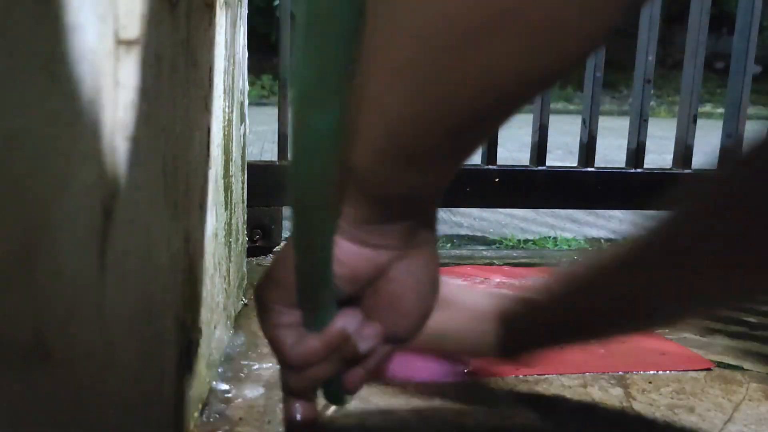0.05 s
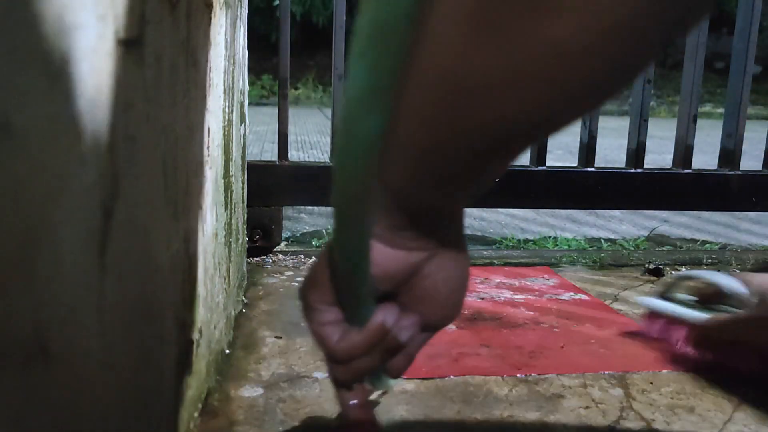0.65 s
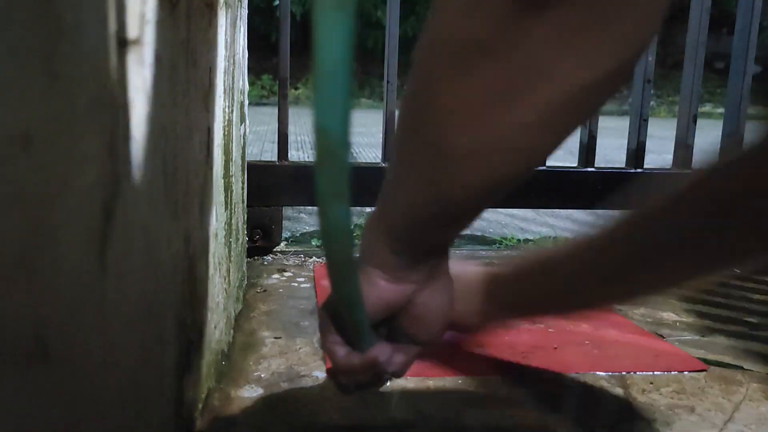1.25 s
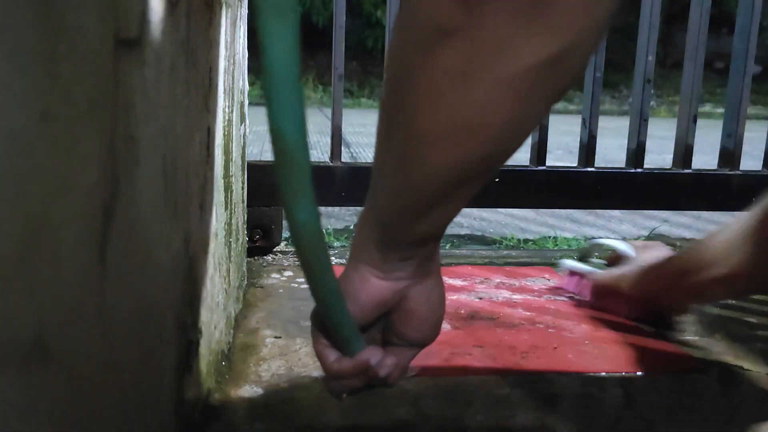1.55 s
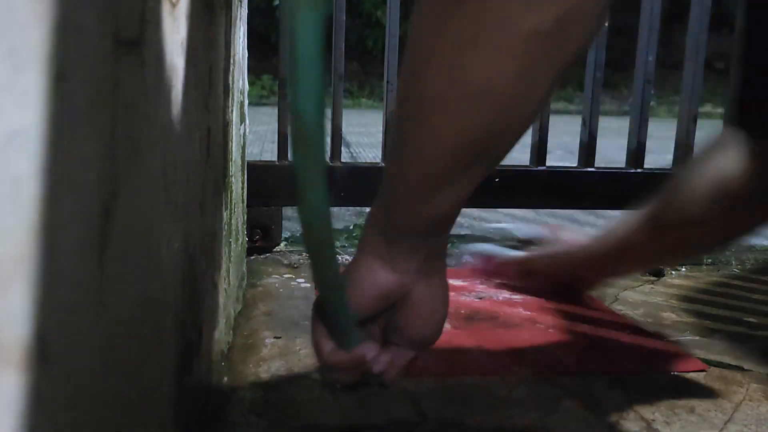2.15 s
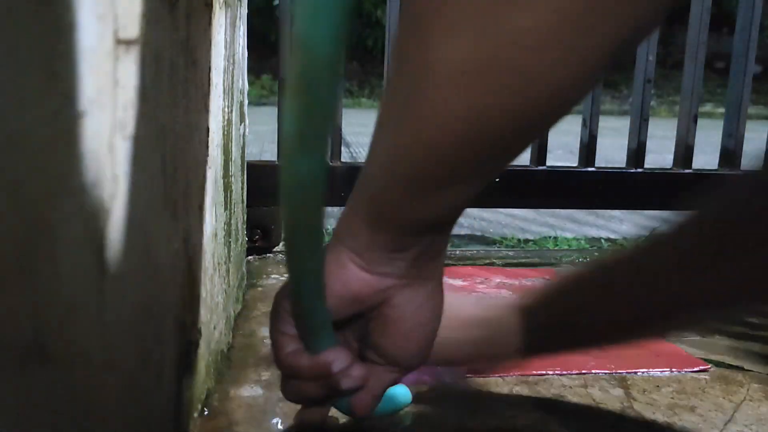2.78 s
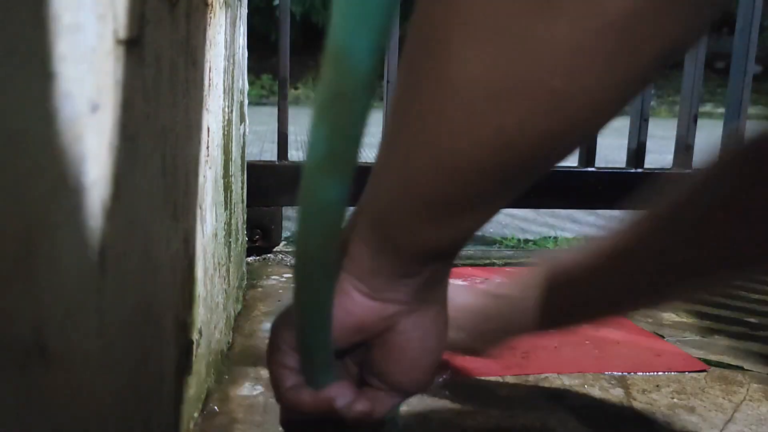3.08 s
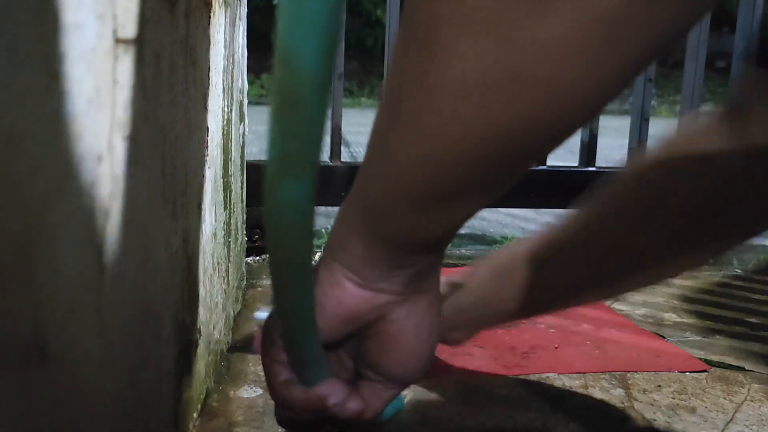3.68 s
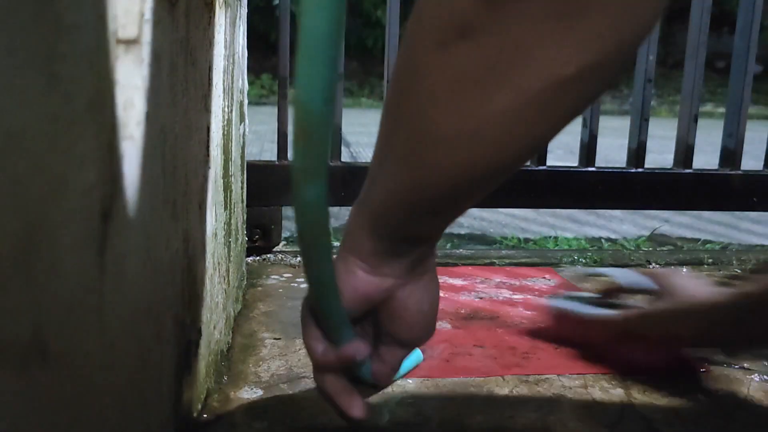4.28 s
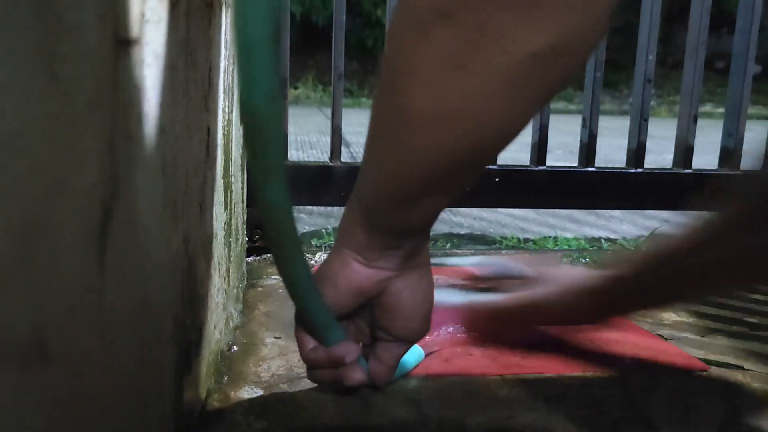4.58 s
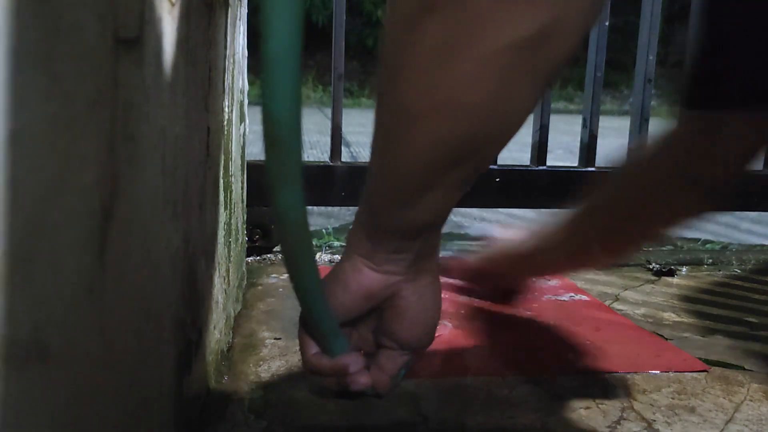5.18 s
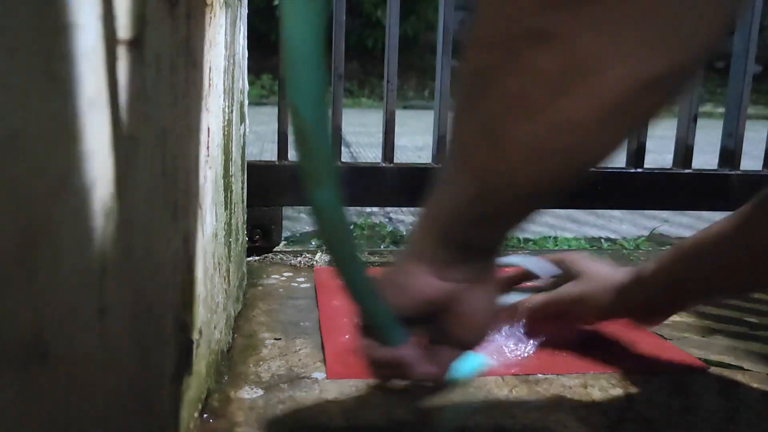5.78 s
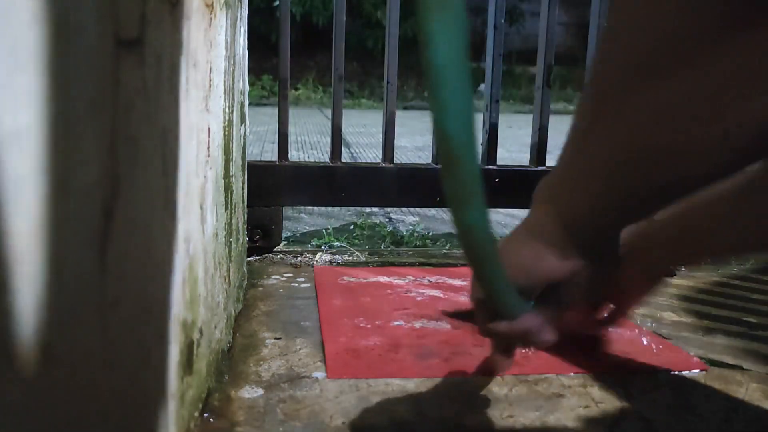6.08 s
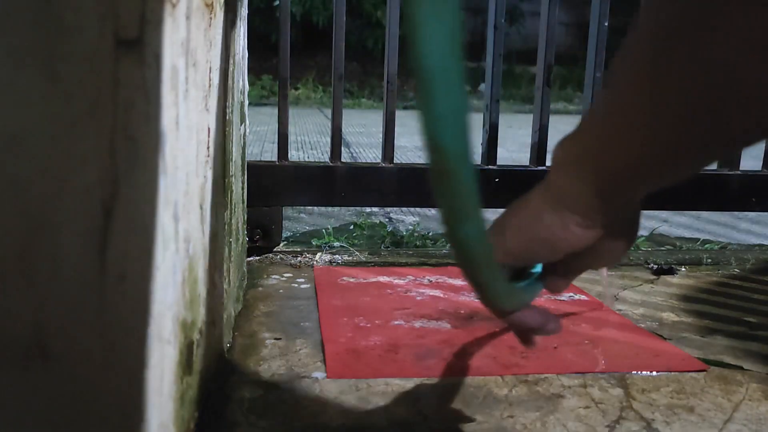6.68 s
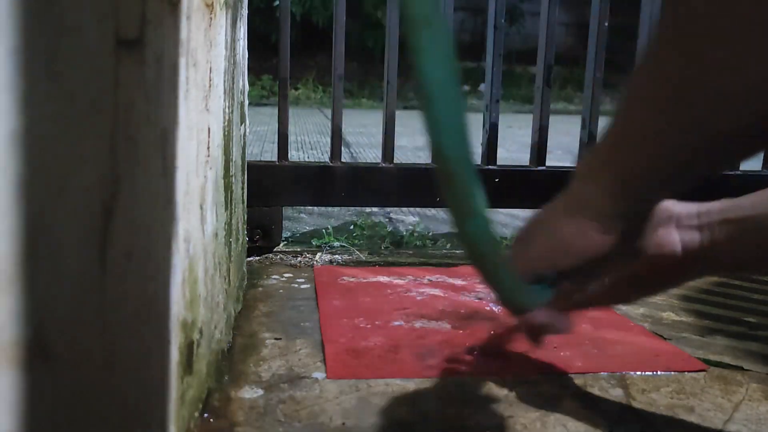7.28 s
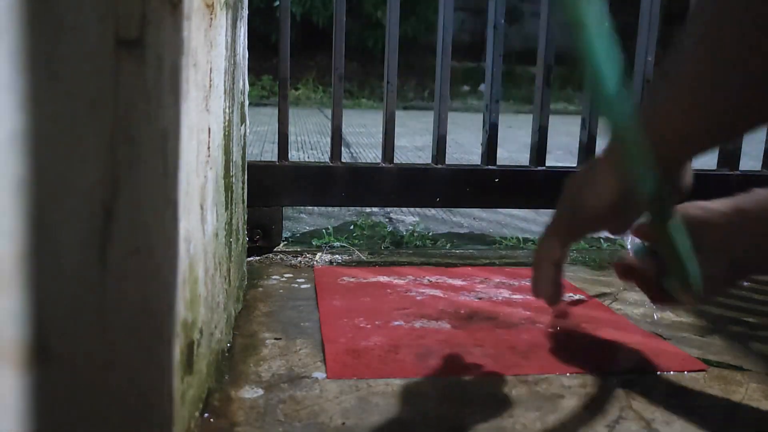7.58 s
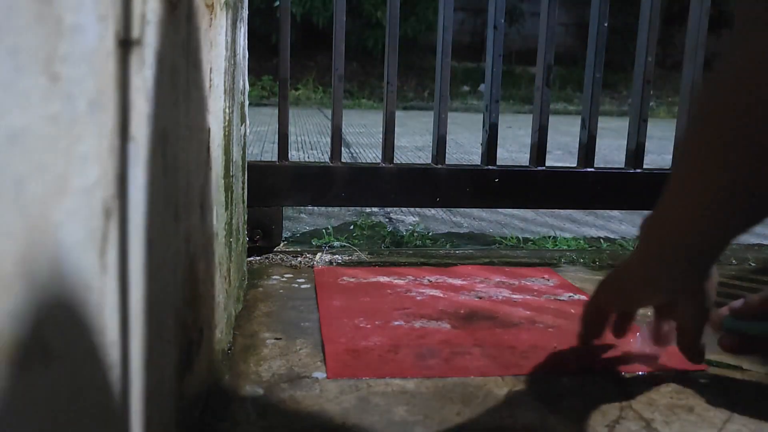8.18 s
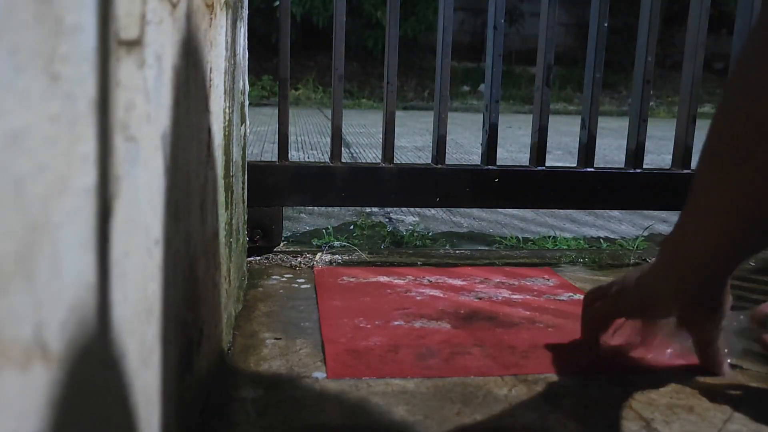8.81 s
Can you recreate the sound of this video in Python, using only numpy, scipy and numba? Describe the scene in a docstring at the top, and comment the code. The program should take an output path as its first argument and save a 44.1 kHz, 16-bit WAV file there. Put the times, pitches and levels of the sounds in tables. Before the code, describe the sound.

A hand brush scrubs wet plastic in quick, hissing strokes, then a loud ringing metal bang and a few small splashes follow.

```python
"""Scrubbing a wet tray

A hand brush scrubs a wet plastic tray on a porch floor, back and forth, close to a phone.
Bristles flip at each turn and hiss, the wet gap under them resonates, and hasty strokes drum the tray.
The brush is tossed aside and bangs on sheet metal, which ducks the phone's limiter;
a hose dribbles and a hand squelches on the tray, over a low rumble and the hum of a distant motor."""
import sys
import numpy as np
from scipy import signal
from scipy.fft import rfft, irfft, next_fast_len
from scipy.io import wavfile
from scipy.ndimage import uniform_filter1d, minimum_filter1d
from numba import njit

SR = 44100
rng = np.random.default_rng(int(sys.argv[2]) if len(sys.argv) > 2 else 0)


def unload_wav(signal):
    """Save mono or channel-first audio to the path in sys.argv[1] as 16-bit WAV at rate SR, clipped to [-1, 1]."""
    wavfile.write(
        sys.argv[1],
        SR,
        np.round(np.clip(np.atleast_2d(signal).T, -1, 1) * 32767).astype(np.int16),
    )


N = 390285
TIME = np.arange(N) / SR
TOP_HZ = 15600
LIFT_S = 6.215  # the brush leaves the tray


def undb(db):
    """Decibels to gain."""
    return 10 ** (np.asarray(db) / 20)


def unit(x):
    """Scale to rms 1."""
    return x / np.sqrt(np.mean(x ** 2))


def noise(size=N):
    """White noise."""
    return rng.standard_normal(size)


def walk(rate_hz):
    """Smooth random drift, spread near 1."""
    steps = noise(int(N / SR * rate_hz) + 2)
    return np.interp(TIME * rate_hz, np.arange(len(steps)), steps) * np.sqrt(3 / 2)


def curve(rows):
    """Join (time [s], value) rows by straight lines."""
    return np.interp(TIME, *np.transpose(rows))


def colour(x, points):
    """Filter by (frequency [Hz], level [dB]) points; rms 1."""
    hz, db = np.transpose(points)
    size = next_fast_len(N)
    bins_hz = np.maximum(np.fft.rfftfreq(size, 1 / SR), 1)
    gain = undb(np.interp(np.log(bins_hz), np.log(hz), db))
    return unit(irfft(rfft(x, size) * gain, size)[:N])


@njit
def svf(x, hz, q):
    """Swept state-variable filter; returns band-pass and high-pass."""
    band, high = np.empty(len(x)), np.empty(len(x))
    band_state, low_state = 0., 0.
    for i in range(len(x)):
        g = np.tan(np.pi * hz[i] / SR)
        v = (band_state + g * (x[i] - low_state)) / (1 + g * (g + 1 / q))
        band[i] = v / q
        high[i] = x[i] - v / q - low_state - g * v
        band_state, low_state = 2 * v - band_state, low_state + 2 * g * v
    return band, high


def resonate(x, hz, q):
    """Two band-passes in series; roughly keeps the rms of white noise."""
    hz = np.clip(hz, 20, SR / 3) * np.ones(len(x))
    for _ in range(2):
        x, _high = svf(x, hz, float(q))
    return x * np.sqrt(2 * SR * q / (np.pi * hz))


def fade(age_s, t60_s):
    """Exponential decay from age 0, silent before."""
    return (age_s >= 0) * np.exp(-np.log(1000) * np.maximum(age_s, 0) / t60_s)


# air spectrum: (frequency [Hz], level [dB])
AIR_SPECTRUM = [(120, -4.5), (200, 0.5), (427, -17), (790, -11.5), (912, -10), (1070, -14.5), (1450, -18.5),
                (2100, -29), (6000, -26), (7000, -22), (7700, -31), (13000, -23), (16000, -37)]


def night_air(level_db=-55):
    """Still night air: faint, steady noise."""
    return colour(noise(), AIR_SPECTRUM) * undb(level_db)


# motor tones: (frequency [Hz], rms level [dB])
MOTOR_TONES = [(59.2, -55), (177.6, -68.5), (915, -67.5), (1540, -66), (1588, -74)]


def motor_hum(waver_db=3.5):
    """A distant motor; each tone wavers in level."""
    return sum(undb(db + waver_db * walk(5.2)) * np.sqrt(2) * np.sin(2 * np.pi * hz * TIME)
               for hz, db in MOTOR_TONES)


# rumble spectrum: (frequency [Hz], level [dB])
RUMBLE_SPECTRUM = [(20, -1), (40, -3.5), (52, -1), (59, 11.5), (68, -4), (130, -3.5), (200, -12),
                   (300, -21), (600, -19), (1500, -19), (4000, -61.5)]
# rumble from the last strokes on: (time [s], level [dB])
LATE_RUMBLE = [(5.94, -47), (6.01, -36), (6.2, -33), (6.66, -55.5), (6.87, -36), (7.2, -32), (7.74, -51),
               (7.84, -38.5), (8.3, -57.5), (8.47, -53), (8.51, -42.5), (8.85, -53)]


def rumble(calm_db=-51.5, hasty_db=-33.5, jolt_db=-41.5, jolt_lag_s=.059, jolt_width_s=.032):
    """Low noise that jolts after each turn, swells with haste, then comes and goes."""
    _, _, haste, age_s = arm_motion()
    jolts = undb(jolt_db) * np.exp(-((age_s - jolt_lag_s) / jolt_width_s) ** 2)
    shaking = undb(calm_db + haste * (hasty_db - calm_db)) + jolts
    gain = np.where(TIME < LATE_RUMBLE[0][0], shaking, undb(curve(LATE_RUMBLE)))
    return colour(noise(), RUMBLE_SPECTRUM) * uniform_filter1d(gain, size=600)


# hose dribble: (time [s], level [dB])
DRIBBLE_LEVEL = [(6.2, -49), (6.4, -58), (6.7, -80.5), (7.22, -49), (7.62, -67.5), (7.8, -54), (8.28, -72),
                 (8.5, -52), (8.85, -78)]


def dribble(gain_db=-2, drop_db=4):
    """Fine spatter from the hose."""
    drops = noise() * undb(drop_db * walk(900))
    spatter = colour(drops, [(1000, -16.5), (3000, -.5), (7000, .5), (12000, -3.5), (15500, -24.5)])
    return spatter * undb(curve(DRIBBLE_LEVEL) + gain_db)


# splashes of water and, near the end, wet squelches of a hand on the tray:
# (time [s], level [dB], centre [Hz])
WET_SPLASHES = [(6.3053, -30, 4750), (6.4552, -37.5, 2750), (7.229, -30, 6590), (7.3074, -31, 6500),
                (7.6657, -25.5, 11600), (7.752, -20, 11360), (7.8096, -11, 10640), (7.815, -39, 3400),
                (7.84, -17.5, 10700), (7.8537, -12.5, 12000), (8.1877, -27, 8900), (8.3586, -31, 2900),
                (8.365, -32, 11100), (8.444, -38, 3100), (8.496, -20, 6900), (8.5, -27, 4400),
                (8.5071, -24.5, 2850), (8.589, -30, 2860), (8.635, -35.5, 2870), (8.811, -28.5, 4170)]


def splashes(burst_db=-12, drop_db=4, bubble_db=-17, bubble_t60_s=.04, scatter_s=.0037, bubbles=5):
    """Each splash or hand squelch is a burst of drops that traps a few ringing bubbles."""
    out = np.zeros(N)
    spatter = unit(noise() * undb(drop_db * walk(700)))
    median_hz = np.median(np.array(WET_SPLASHES)[:, 2])
    for time_s, db, hz in WET_SPLASHES:
        start = int(time_s * SR)
        drops = spatter[start:start + SR // 4]
        age_s = TIME[:len(drops)]
        t60_s = .063 * (median_hz / hz) ** .27  # lower splashes linger
        splash = resonate(drops, hz, q=5.3) * undb(burst_db) * fade(age_s, t60_s)
        for detune, delay in rng.standard_normal((bubbles, 2)):
            bubble_hz = min(hz * np.exp(.27 * detune), TOP_HZ)
            since_s = age_s - scatter_s * abs(delay)
            bubble = fade(since_s, bubble_t60_s) * np.sin(2 * np.pi * bubble_hz * since_s)
            splash += undb(bubble_db) / np.sqrt(bubbles) * bubble
        out[start:start + len(drops)] += undb(db) * splash
    return out


# sheet metal modes: (frequency [Hz], level [dB], t60 [s])
METAL_MODES = [(450, -25, .45), (716, -22.5, 0.5), (810, -26, 0.82), (881, -11, .65), (893, 0, .72),
               (914, -6, .72), (968, -2, .72), (1003, -11, .72), (1043, -20, .65), (1075, -15, .78),
               (1179, -19, .6), (1241, -17.5, 0.55), (1463, -19, 0.34), (1530, -21, 0.51),
               (1700, -10.5, 0.22), (1997, -12.5, .3), (2000, -13, 0.21), (2099, -18.5, .3),
               (2050, -15.5, .31), (2180, -11, 0.27), (2295, -17, .38), (2350, -22, 0.37)]
# its dense overtones: (centre [Hz], width [Hz], level [dB], t60 [s])
RATTLE_BANDS = [(420, 200, -28, 0.24), (720, 410, -16, 0.38), (1230, 280, -12.5, 0.46),
                (2430, 370, -12.5, 0.24), (3120, 590, -17, 0.19), (4800, 1600, -29, 0.2)]


def metal_bang(hit_s=6.7648, damped_s=7.26, gain_db=11, knock_db=7, knock_hz=850,
               contact_s=.0018, rattle_lag_s=.0064, rattle_rise_s=.021):
    """A dull knock rings the sheet metal; the brush rattles on it; the ring ends damped."""
    age_s = np.arange(2 * SR) / SR
    ring = sum(undb(db) * fade(age_s, t60_s) * np.sin(2 * np.pi * (hz * age_s + rng.random()))
               for hz, db, t60_s in METAL_MODES)
    knock = undb(knock_db) * fade(age_s, t60_s=.031) * np.sin(2 * np.pi * knock_hz * age_s)
    rattle_age_s = age_s - rattle_lag_s
    rattle = sum(undb(db) * fade(rattle_age_s, t60_s) * resonate(noise(len(age_s)), hz, hz / width_hz)
                 for hz, width_hz, db, t60_s in RATTLE_BANDS)
    rattle *= np.clip(rattle_age_s / rattle_rise_s, 0, 1)
    attack = 1 - np.exp(-(age_s / contact_s) ** 2)
    damping = fade(np.maximum(hit_s + age_s - damped_s, 0), t60_s=.16)
    blow = (ring + knock + rattle) * attack * damping
    return undb(gain_db) * np.pad(blow, (int(hit_s * SR), N))[:N]


# brush block on the tray: (time [s], level [dB])
BLOCK_BUMPS = [(0.651, -29), (1.127, -31), (1.614, -22), (3.695, -21), (4.762, -24.5), (4.79, -29)]


def bumps(t60_s=.078):
    """Dull, short knocks of the brush block on the plastic."""
    thud = colour(noise(), [(40, -7.5), (130, -1), (300, -4), (600, -4.5), (1200, 4.5), (4000, -35.5)])
    return thud * sum(undb(db) * fade(TIME - time_s, t60_s) for time_s, db in BLOCK_BUMPS)


# pockets of suds: (time [s], centre [Hz], Q, level [dB], length [s])
SUDS_POCKETS = [(0.08, 2040, 6, -23, 0.04), (0.148, 730, 5.3, -35.5, 0.026), (0.28, 1890, 6, -18.5, 0.049),
                (0.485, 1880, 10, -19, 0.054), (0.743, 1520, 6, -23, 0.075),
                (0.962, 2180, 11, -16.5, 0.048), (1.41, 2114, 11, -18.5, .045),
                (1.632, 1540, 3.7, -18, 0.055), (1.638, 4370, 4.9, -13, 0.064),
                (1.84, 2400, 1.9, -15, 0.041), (1.996, 4550, 5.8, -15.5, .07),
                (2.295, 2300, 2.7, -15.5, 0.056), (2.634, 716, 4.5, -33, .026),
                (3.043, 1390, 10, -23.5, 0.012), (3.395, 4140, 4.5, -16, 0.041),
                (3.822, 720, 6.9, -38, 0.035), (4.555, 2125, 7, -14.5, 0.034),
                (4.783, 1680, 3.3, -12, 0.054), (4.986, 2370, 6, -12.5, 0.052),
                (5.55, 620, 3.7, -38.5, 0.016), (5.65, 1600, 2.6, -15.5, 0.037),
                (5.823, 4430, 9, -14.5, 0.038), (6.238, 1306, 6.5, -33, 0.011)]


def squelches(sink=.05):
    """Suds squeezed out; each hollow note sinks as its pocket opens."""
    out = np.zeros(N)
    for time_s, hz, q, db, length_s in SUDS_POCKETS:
        near = np.abs(TIME - time_s) < 2 * length_s
        progress = (TIME[near] - time_s) / length_s
        note = resonate(noise(near.sum()), hz * np.exp(-sink * progress), q)
        out[near] += note * undb(db) * np.exp(-2 * progress ** 2)
    return out


def wet_hollows(x, depth_db=4.5, corner_hz=7500):
    """Hollows among the bristles open and close: narrow peaks come and go, less so at the top."""
    bins_hz, _, spectra = signal.stft(x, SR, nperseg=512)
    patch = np.outer(np.hanning(9), np.hanning(17))
    field = signal.fftconvolve(noise(spectra.shape), patch / np.sqrt(np.sum(patch ** 2)), "same")
    gain = undb(depth_db * field / np.hypot(1, bins_hz / corner_hz)[:, None])
    gain /= np.sqrt(np.mean(gain ** 2, axis=1, keepdims=True))
    return signal.istft(spectra * gain)[1][:N]


def gap_highpass(x, gap_hz):
    """Little sound escapes below the resonance of the wet gap."""
    cutoff_hz = uniform_filter1d(.75 * gap_hz, size=400)
    for _ in range(2):
        _band, x = svf(x, cutoff_hz, q=.93)
    return x


def bristle_flip(ticks, accent_db, age_s, spray_db=-23, nudge_db=-41):
    """Bristles flip over: a brief spray of ticks and a nudge to the tray."""
    spray = ticks * undb(spray_db + accent_db)
    nudge = colour(noise(), [(40, -6), (130, -3), (300, -4.5), (900, -2.5), (3000, -39.5)])
    return (spray + nudge * undb(nudge_db)) * fade(age_s, t60_s=.015)


# hiss treble over mids: (time [s], level [dB])
HISS_TILT = [(0.0, 1.5), (0.7, 5), (1.35, 10), (2.0, 10), (2.7, 4), (3.6, -3.5), (4.25, 1), (4.5, 7),
             (5.0, 4.5), (5.2, 1), (5.9, 1.5)]


def bristle_hiss(ticks, travel, fall_db=7.5, split_hz=7000):
    """The hiss dulls over a stroke as the bristles gather water."""
    tilt_db = curve(HISS_TILT) - fall_db * (travel - .5)
    mids = signal.sosfiltfilt(signal.butter(2, split_hz, fs=SR, output="sos"), ticks)
    return mids * undb(-tilt_db / 2) + (ticks - mids) * undb(tilt_db / 2)


def arm_motion(full_stroke_s=.16, hasty_stroke_s=.15):
    """Per sample: stroke index, share travelled [0-1], haste [0-1], time since the turn [s]."""
    turns_s = np.array(BRUSH_STROKES)[:, 0]
    lengths_s = np.diff(np.append(turns_s, LIFT_S))
    pace_s = signal.medfilt(np.pad(lengths_s, 1, mode="edge"))[1:-1]  # one short stroke is not haste
    stroke = np.clip(np.searchsorted(turns_s, TIME) - 1, 0, None)
    age_s = TIME - turns_s[stroke]
    travel = np.clip(age_s / lengths_s[stroke], 0, 1)
    haste = np.clip((full_stroke_s - pace_s[stroke]) / (full_stroke_s - hasty_stroke_s), 0, 1)
    return stroke, travel, haste, age_s


# turns taken without stopping: (time [s], speed re full [dB])
ROUNDED_TURNS = [(0.19, -16), (1.927, -6.5), (2.65, -7.5), (5.513, -9), (5.932, -23)]


def brush_speed(travel, haste, crest, turn_s=.035):
    """Speed [0-1] peaks at the crest; hasty and rounded turns keep some of it."""
    rounding = sum(undb(db) * np.exp(-((TIME - time_s) / turn_s) ** 2) for time_s, db in ROUNDED_TURNS)
    slowest = .012 + .033 * haste + rounding
    skew = np.log(.5) / np.log(crest)
    return slowest + (1 - slowest) * np.abs(np.sin(np.pi * travel ** skew))


# bristle ticks: (frequency [Hz], level [dB])
TICK_SPECTRUM = [(250, -40.5), (550, -37), (1000, -36.5), (2000, -7), (3300, -14), (4500, 4), (5500, -3),
                 (7000, 2.5), (7700, -2), (8700, 3), (9600, -3.5), (11000, 0), (13000, -5), (15500, -19)]
# strokes: (turn [s], flip [s], hiss [dB], gap [dB], gap resonance [Hz],
#           hardest press [share of stroke], rasp [dB], rasp centre [Hz])
BRUSH_STROKES = [(-0.07, -0.03, -14, -13, 1970, 0.54, -20.5, 4580),
                 (0.186, 0.219, -14, -17.5, 1750, 0.4, -18, 4400),
                 (0.396, 0.454, -12, -26, 2060, 0.4, -29.0, 4400),
                 (0.601, 0.65, -9.5, -21.5, 1480, 0.64, -17, 4200),
                 (0.822, 0.873, -13, -26, 1550, 0.44, -21, 4200),
                 (1.074, 1.117, -13.5, -14, 1880, 0.61, -14.5, 3400),
                 (1.288, 1.34, -15, -24, 2400, 0.55, -13, 4100),
                 (1.502, 1.569, -12.5, -13, 1890, 0.56, -9.5, 3100),
                 (1.728, 1.762, -13.5, -18.5, 1710, 0.69, -11.5, 3300),
                 (1.923, 1.955, -21, -26.5, 1570, 0.48, -12, 3300),
                 (2.084, 2.148, -11.5, -14, 2130, 0.69, -19.5, 3500),
                 (2.408, 2.465, -12.5, -15, 1770, 0.64, -11.5, 2900),
                 (2.641, 2.685, -12, -16, 1770, 0.53, -15.5, 2700),
                 (2.83, 2.881, -13.5, -12, 1960, 0.56, -17, 3100),
                 (3.024, 3.08, -15.5, -22.5, 1570, 0.76, -23.5, 2600),
                 (3.168, 3.225, -16, -22.0, 1750, 0.65, -24.5, 2600),
                 (3.306, 3.35, -16.5, -19.0, 1720, 0.68, -18.5, 3200),
                 (3.452, 3.485, -15, -19, 1770, 0.62, -21, 2600),
                 (3.588, 3.632, -14.5, -17.5, 1720, 0.8, -16.5, 2900),
                 (3.734, 3.767, -14.5, -21.5, 1700, 0.64, -18.5, 2700),
                 (3.873, 3.935, -13.5, -23.5, 1640, 0.76, -19.5, 2900),
                 (4.026, 4.066, -12.5, -19, 1760, 0.51, -20, 3070),
                 (4.165, 4.225, -12, -23, 1750, 0.56, -16, 3240),
                 (4.43, 4.46, -10, -17.5, 2030, 0.57, -15, 3510),
                 (4.663, 4.714, -9.5, -15, 1595, 0.62, -11, 2800),
                 (4.887, 4.926, -10.5, -21, 2330, 0.76, -19, 3600),
                 (5.093, 5.128, -10.5, -25, 1760, 0.63, -16.5, 2900),
                 (5.295, 5.356, -11.5, -25, 2280, 0.8, -19.5, 2900),
                 (5.503, 5.545, -8.5, -12, 1730, 0.66, -13.5, 3150),
                 (5.735, 5.798, -16, -27.5, 1750, 0.61, -18, 3500),
                 (5.935, 5.984, -13.5, -28.5, 1460, 0.62, -15.5, 3350),
                 (6.058, 6.089, -26, -39, 1730, 0.54, -31, 3300)]


def scrubbing(gain_db=-1, bent_db=-5, creep_db=-3, creep_s=.019, fizz_db=-10, grumble_db=-47,
              drum_db=-56, hasty_drum_db=-32.5, speed_power=2.146, hasty_power=1,
              gap_sink_oct=.25, gap_bow_oct=.4, wobble=.064):
    """Brush speed drives the bristle hiss, the suds, the wet gap, the rasp and the tray."""
    stroke, travel, haste, _ = arm_motion()
    _, flip_s, hiss_db, gap_db, note_hz, press_crest, rasp_db, rasp_hz = np.array(BRUSH_STROKES)[stroke].T
    accent_db = hiss_db - np.median(hiss_db)
    hiss_crest = .51 + .82 * haste * (press_crest - .51)
    exponent = speed_power + haste * (hasty_power - speed_power)
    # bristles bend, creep, then flip and slide; haste bends them less
    bend = 1 - .43 * haste
    slack_db = bent_db * (TIME < flip_s) + creep_db * (TIME < flip_s - creep_s)
    bite = undb(gain_db + bend * slack_db) * (TIME < LIFT_S)
    tufts = undb(walk(260))  # tufts catch and let go together

    def push(db, crest, drive=.3):
        """Gain that grows with speed; more drive levels it off sooner."""
        rub = brush_speed(travel, haste, crest) ** exponent
        return uniform_filter1d(undb(db) * bite * np.tanh(drive * rub) / np.tanh(drive), size=130)

    def bristles(slosh_db=.75):
        """Dense, uneven ticks."""
        return unit(noise() * tufts * undb(slosh_db * walk(55)))

    ticks = colour(bristles(), TICK_SPECTRUM)
    hiss = bristle_hiss(ticks, travel) * push(hiss_db, hiss_crest, drive=.99)
    # hasty strokes whip up suds
    fizz = colour(bristles(), [(6000, -29.5), (11000, -10), (14000, 2), (16000, -13.5), (19000, -33.5)])
    fizz *= haste * push(hiss_db + fizz_db, hiss_crest, drive=.99)
    # the water-filled gap changes size as the brush tips
    tip = travel - press_crest
    glide_oct = (1 - haste) * (gap_bow_oct * tip ** 2 - gap_sink_oct * tip)
    gap_hz = note_hz * 2 ** glide_oct * np.exp(wobble * walk(60))
    gap = resonate(bristles(), gap_hz, q=2.2) * push(gap_db, press_crest)
    rasp = resonate(bristles(), rasp_hz * np.exp(wobble * walk(40)), q=2.1)
    rasp *= push(rasp_db, (hiss_crest + press_crest) / 2)
    swish = gap_highpass(hiss + fizz + gap + rasp, gap_hz)
    # the tray drums under hasty strokes and grumbles under hard ones
    drum = resonate(bristles(), hz=830, q=1.3)
    drum *= push(drum_db + haste * (hasty_drum_db - drum_db) + accent_db, hiss_crest)
    effort_db = gap_db + rasp_db - np.median(gap_db + rasp_db)
    grumble = colour(bristles(), [(100, -8), (400, -5.5), (1100, -2), (2500, -.5), (6000, -43)])
    grumble *= push(grumble_db + .37 * effort_db, press_crest)
    flips = bend * bristle_flip(ticks, accent_db, TIME - flip_s)
    return wet_hollows(swish + drum + grumble) + flips


def porch(x, wet_db=-17, delay_s=.004, t60_s=.18):
    """Short reflections from wall and floor."""
    age_s = np.arange(SR // 2) / SR
    tail = noise(len(age_s)) * fade(age_s - delay_s, t60_s)
    tail /= np.sqrt(np.sum(tail ** 2))
    return x + undb(wet_db) * signal.fftconvolve(x, tail)[:N]


def scene():
    """Mono mix; brushwork and water get the porch reflections."""
    background = night_air() + motor_hum() + rumble()
    water = dribble() + splashes()
    brushwork = bumps() + squelches() + scrubbing()
    return (background + metal_bang() + porch(water + brushwork))[None]


def record(dry, ceiling_db=-6, release_db_per_s=74):
    """The phone's limiter ducks at once on high power or peak and recovers steadily; the top is cut."""
    power = np.abs(uniform_filter1d(dry ** 2, size=220))
    peak = -minimum_filter1d(-np.abs(dry), size=65)
    over_db = np.maximum(10 * np.log10(power + 1e-12) - ceiling_db, 20 * np.log10(np.maximum(peak, 1)))
    recovery_db = release_db_per_s * TIME
    duck_db = np.maximum.accumulate(over_db + recovery_db, axis=-1) - recovery_db
    limited = dry * undb(-uniform_filter1d(duck_db, size=65))
    return signal.sosfilt(signal.ellip(10, .2, 70, TOP_HZ, fs=SR, output="sos"), limited)


dry = scene()
out = record(dry)
unload_wav(out)
```